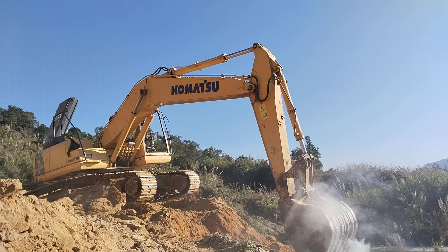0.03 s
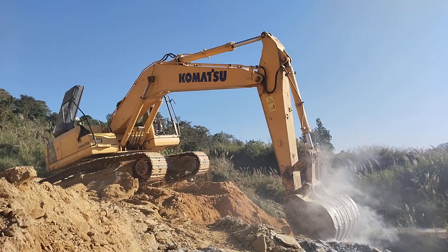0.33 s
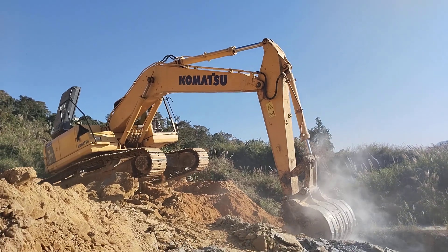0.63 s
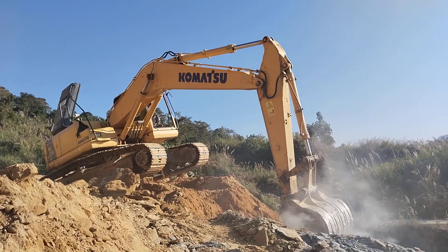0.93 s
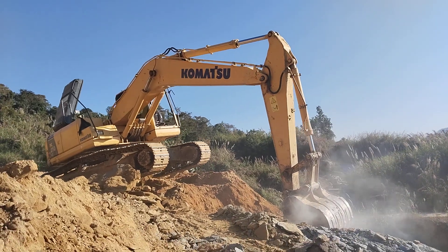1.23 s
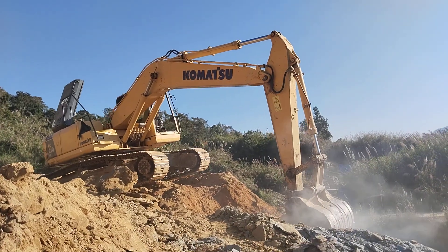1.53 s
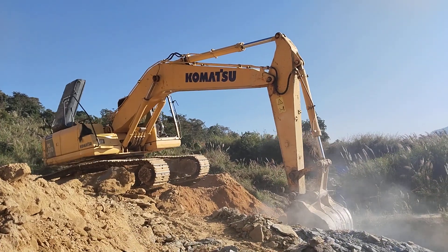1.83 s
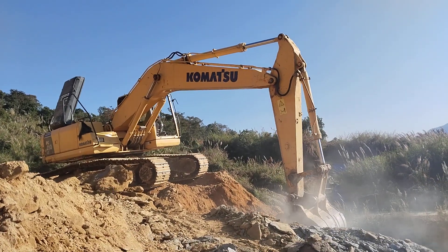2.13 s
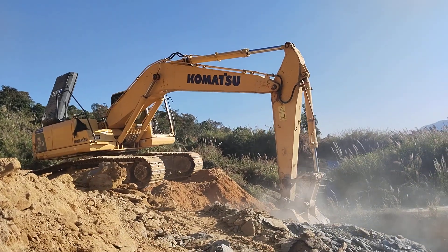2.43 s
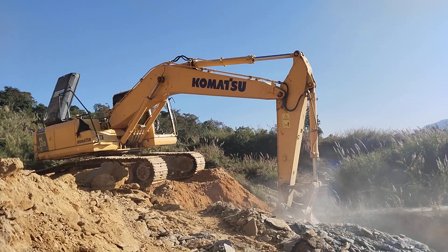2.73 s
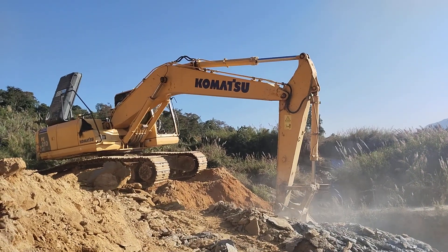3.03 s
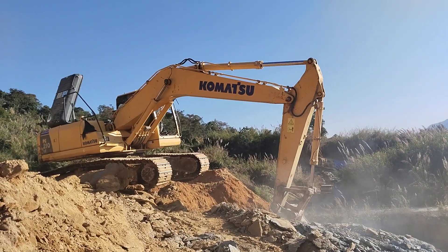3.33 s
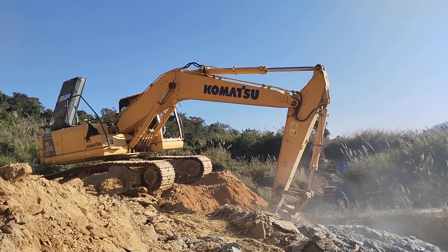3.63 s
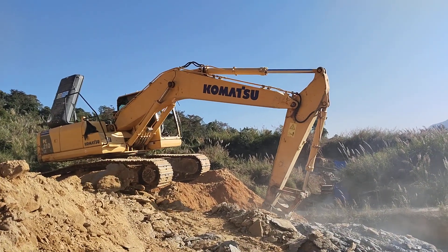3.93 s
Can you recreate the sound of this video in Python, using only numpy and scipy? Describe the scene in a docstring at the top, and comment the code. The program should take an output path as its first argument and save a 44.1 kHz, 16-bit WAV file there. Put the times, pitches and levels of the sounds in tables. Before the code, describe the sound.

An excavator digs rock, engine rumbling steadily under scrapes, clanks and sliding rubble.

```python
"""A diesel excavator digs in an open quarry. Its six-cylinder engine drones and picks up under load:
exhaust orders, a roar that puffs with each firing, block clatter, a faint turbo whistle.
The steel bucket stick-slips over rock and knocks against it, cracking stone and ringing its modes.
Rubble slides, stones thud, and a low hum swells under load near the end.
On the left a high hiss throbs, like insects in dry grass."""
import sys
import numpy as np
from scipy import signal
from scipy.fft import rfft, irfft
from scipy.io import wavfile
from scipy.ndimage import uniform_filter1d, minimum_filter1d

SR = 44100
rng = np.random.default_rng(int(sys.argv[2]) if len(sys.argv) > 2 else 0)


def unload_audio(sound):
    """Save the sound as a 16-bit wav file, at the path given as the first command line argument."""
    columns = np.transpose(np.atleast_2d(sound))
    # keep every value between -1 and 1, then stretch to whole-number steps
    steps = np.round(np.clip(columns, -1, 1) * 32767)
    wavfile.write(sys.argv[1], SR, steps.astype(np.int16))


N = 176400
T = np.arange(N) / SR
START_S = 0.18


def amp(db):
    """dB to gain."""
    return 10 ** (np.asarray(db) / 20)


def unit(x):
    """Scale to rms 1."""
    return x / np.sqrt(np.mean(x ** 2) + 1e-20)


def curve(points):
    """Interpolate (time, value) over T."""
    return np.interp(T, *np.transpose(points))


def at_hz(points, hz):
    """Interpolate (frequency, value) on a log axis."""
    f, value = np.transpose(points)
    return np.interp(np.log(hz + 1), np.log(f + 1), value)


def colour(x, spectrum):
    """Filter by a dB spectrum; rms 1."""
    size = x.shape[-1]
    return unit(irfft(rfft(x) * amp(at_hz(spectrum, np.fft.rfftfreq(size, 1 / SR))), size))


def wander(hz):
    """Random drift up to about hz; rms 1."""
    return unit(irfft(rfft(rng.standard_normal(N)) * np.exp(-(np.fft.rfftfreq(N, 1 / SR) / hz) ** 2), N))


def pan(left_db):
    """Channel gains for a left-minus-right level."""
    return unit(amp([[left_db / 2], [-left_db / 2]]))


def pan_bands(x, split_hz, low_db, high_db):
    """Pan lows and highs separately; positive is left."""
    low = signal.sosfiltfilt(signal.butter(2, split_hz, fs=SR, output="sos"), x)
    return low * pan(low_db) + (x - low) * pan(high_db)


def spread(pair):
    """Two independent signals to one distant, partly coherent stereo sound."""
    # (frequency [Hz], left-right coherence [0-1])
    coherence = [(60, .999), (200, 0.87), (500, 0.64), (1200, 1), (2400, 1), (4500, 0.43), (14000, 0.66)]
    # (frequency [Hz], left phase lead [rad])
    lead = [(60, -1), (400, 0.82), (1030, -2), (2150, -1.5), (3270, -0.86), (7060, 2), (15000, 6)]
    left, other = rfft(pair)
    hz = np.fft.rfftfreq(N, 1 / SR)
    same = np.clip(at_hz(coherence, hz), 0, 1)
    right = (same * left + np.sqrt(1 - same ** 2) * other) * np.exp(-1j * at_hz(lead, hz))
    return irfft(np.array([left, right]), N)


def noise(spectrum):
    """Distant coloured noise."""
    return colour(spread(rng.standard_normal((2, N))), spectrum)


def grains(per_s, size_db):
    """Random stereo clicks of uneven size."""
    size = amp(size_db * np.minimum(rng.exponential(1, N), 4)) * (rng.random(N) < per_s / SR)
    return unit(spread(size * rng.standard_normal((2, N))))


def add(mix, start_s, sound):
    """Mix in at start_s."""
    part = mix[:, max(round(start_s * SR), 0):][:, :sound.shape[1]]
    part += sound[:, :part.shape[1]]


def exhaust_note(cycle, cylinders, firing_waver=0.076, other_waver=0.29):
    """Wavering engine orders; a hum between orders beats against the firing."""
    # (multiple of engine cycle, level [dB])
    orders = [(4, -18), (4.67, -14), (6, 0), (7, -21), (8, -17), (10, -17), (12, -19), (17, -25), (18, -27),
              (20, -25)]
    # (time [s], level [dB])
    note_level = [(0.25, -33), (0.5, -17), (1.0, -17.5), (1.3, -16.5), (2.0, -15.5), (2.4, -15),
                  (2.8, -14.5), (4, -15.5)]
    note = 0
    for order, db in orders:
        depth = firing_waver if order == cylinders else other_waver
        waver = 1 + depth * (wander(7.9) + 1j * wander(3.1))
        note += amp(db) * (waver * np.exp(2j * np.pi * (order * cycle + rng.random()))).real
    return unit(note) * amp(curve(note_level))


def turbo(flicker_db=5.3, jitter_hz=60):
    """Thin, unsteady turbocharger whistle."""
    # (time [s], pitch [Hz], level [dB])
    whistle = [(0.6, 10350, -73), (2.8, 10700, -62), (3.7, 11030, -53), (4, 11020, -60)]
    s, hz, db = np.transpose(whistle)
    level = amp(np.interp(T, s, db) + flicker_db * wander(17))
    pitch_hz = np.interp(T, s, hz) + jitter_hz * wander(126)
    return level * np.sin(2 * np.pi * np.cumsum(pitch_hz) / SR)


def engine(cylinders=6, puff=0.44, rattle=0.044, flutter_db=1.0, clatter_db=-33.5):
    """Diesel: exhaust note and turbo, plus roar and block clatter pulsed by each firing."""
    # (time [s], firing rate [Hz])
    firing_rate = [(0.78, 88), (1.0, 93), (1.28, 88), (2.22, 88.4), (2.43, 92.7), (2.65, 88), (4, 88.1)]
    # (frequency [Hz], density [dB])
    roar_spectrum = [(22, -48), (40, -28), (62, -1.5), (85, -4.5), (120, 2.5), (175, 0.5), (220, -9.5),
                     (290, -13.5), (360, -22), (480, -26), (900, -43)]
    clatter_spectrum = [(300, -5.5), (460, -15), (525, 3), (640, -11), (790, 0.5), (880, -15.5),
                        (1150, -5.5), (1380, -19.5), (1800, -4), (2250, 2.5), (2900, -6.5), (3450, -8.5),
                        (4400, -21.5), (7500, -20.5), (13000, -73)]
    # (time [s], level [dB])
    roar_level = [(0.18, -31), (0.45, -22), (1.0, -23), (1.45, -28), (2.1, -26), (2.3, -22), (2.55, -25.5),
                  (2.8, -23.5), (3.1, -27.5), (3.4, -24.5), (4, -26)]
    cycle = np.cumsum(curve(firing_rate)) / SR / cylinders
    firing = np.cos(2 * np.pi * cylinders * cycle)
    note = exhaust_note(cycle, cylinders)
    roar = unit(noise(roar_spectrum) * (1 + puff * firing)) * amp(curve(roar_level))
    clatter = unit(noise(clatter_spectrum) * (1 + rattle * firing) * amp(flutter_db * wander(38)))
    clatter = pan_bands(clatter * amp(clatter_db), split_hz=2700, low_db=6.5, high_db=9.5)
    return (note + roar) * pan(1.0) + clatter + turbo()


def bucket_ring(focus_hz, detune, focus_oct=0.15, off_focus_db=-10.5, vary_db=1.5):
    """One contact rings the steel, most near focus_hz; its place and pressure vary the modes."""
    # (frequency [Hz], level [dB], t60 [s])
    modes = [(625, -3, 0.075), (1154, -1, 0.079), (1538, 2, 0.042), (1653, -3, 0.093), (2067, 1, 0.035),
             (2310, 3.5, 0.06), (2540, -5, 0.11), (2746, 4.5, 0.059), (2877, 7, 0.042), (3147, 1.5, 0.047),
             (3530, -17, 0.025)]
    t, ring = T[:SR // 5], 0
    for hz, db, t60 in modes:
        louder, sharper = 2 * rng.random(2) - 1
        phase = rng.random() + 0.24 * rng.random((2, 1))
        off_focus = 1 - np.exp(-(np.log2(hz / focus_hz) / focus_oct) ** 2)
        envelope = amp(db + off_focus_db * off_focus + vary_db * louder - 60 * t / t60)
        ring += envelope * np.sin(2 * np.pi * (hz * (1 + detune * sharper) * t + phase))
    return ring


def scrape(ring_db=-4, crunch_db=-1, judder_db=1.5, bite_db=-20, contacts_per_s=45, contacts=11):
    """Teeth stick and slip: each slip cracks rock, and rings the bucket more on a hard bite."""
    # (time [s], scraping force [dB])
    force = [(0.18, -37), (0.31, -26.5), (0.365, -21.5), (0.47, -19.5), (0.51, -12), (0.555, -19),
             (0.585, -29), (0.63, -27), (0.692, -16), (0.73, -29.5), (0.9, -27), (0.99, -21), (1.1, -35.5),
             (1.4, -41), (2.3, -32.5), (2.62, -35.5), (2.73, -27.5), (2.85, -38)]
    # rock cracking under steel (frequency [Hz], density [dB])
    crunch_spectrum = [(100, -32), (300, 3.5), (650, -6), (1100, 6.5), (1380, -6.5), (1600, 3),
                       (1950, -12.5), (2950, 3), (3600, -4), (5000, -13), (8000, -14.5), (15000, -38)]
    slips = unit(grains(per_s=5000, size_db=0.5) * amp(judder_db * wander(64)))
    contact = (T * contacts_per_s).astype(int) % contacts
    ring = 0
    for k, hz in enumerate(rng.permutation(np.geomspace(1100, 3400, contacts))):
        drive = (slips + slips[0]) * (contact == k)
        ring += signal.oaconvolve(drive, unit(bucket_ring(hz, detune=0.048)), axes=1)[:, :N]
    force_db = curve(force)
    ring = unit(ring) * amp(ring_db + np.minimum(force_db - bite_db, 0) / 2)
    crunch = amp(crunch_db) * colour(slips, crunch_spectrum)
    return pan_bands(ring + crunch, split_hz=850, low_db=-6, high_db=1.5) * amp(force_db)


def rubble():
    """Loose stones tumble in short slides."""
    # (peak time [s], level [dB], rise [s], fall [s])
    slides = [(0.22, -26.5, 0.035, 0.34), (0.405, -14, 0.053, 0.088), (0.76, -27.5, 0.084, 0.14),
              (1.013, -19.5, 0.044, 0.09), (2.29, -26, 0.027, 0.083), (2.43, -31.5, 0.034, 0.15),
              (2.71, -28, 0.045, 0.13)]
    # (frequency [Hz], density [dB])
    spectrum = [(100, 5), (260, 2.5), (400, 1), (480, -13), (600, 1), (780, 0), (950, -6), (1160, 0.5),
                (1350, -14), (1600, -7.5), (10000, -54)]
    level = 0
    for s, db, rise_s, fall_s in slides:
        level += amp(db) * np.where(T < s, np.exp(-((T - s) / rise_s) ** 2), np.exp(-abs(T - s) / fall_s))
    return colour(grains(per_s=2000, size_db=1.5), spectrum) * level * pan(-0.73)


def knocks(crack_rise_s=0.00069, ring_rise_s=0.00061):
    """Bucket blows: stone cracks, steel rings. They move left as the bucket is drawn in."""
    # (time [s], crack level [dB], crack decay [s], ring level [dB], focus [Hz])
    blows = [(0.3585, -19, .016, -15, 2950), (0.409, -20, .022, -16, 2880),
             (0.4635, -17.5, .018, -22, 2800), (0.506, -16, .022, -19, 3100),
             (0.5125, -23, .006, -16.5, 2330), (0.5385, -16.5, .011, -20, 2730),
             (0.546, -24, .006, -11, 1535), (0.548, -24, .006, -13.5, 2520),
             (0.6435, -16.5, .009, -10.5, 1950), (0.6825, -16.5, .018, -19, 2800),
             (2.4582, -13.5, .0035, -28, 2880), (2.6892, -12.5, .005, -19, 2850),
             (3.2835, -19.5, .002, -24, 3100)]
    # (frequency [Hz], density [dB])
    crack_spectrum = [(200, -45), (700, -13), (1200, 0.5), (1800, 2.5), (2900, 6), (3800, -0.5),
                      (5500, -11.5), (9000, -19), (15000, -60)]
    # (time [s], left minus right [dB])
    position = [(0.5, 1.5), (2.4, 12)]
    out, t = np.zeros((2, N)), T[:SR // 5]
    for s, crack_db, decay_s, ring_db, focus_hz in blows:
        burst = rng.standard_normal(len(t)) + .5 * rng.standard_normal((2, len(t)))
        crack = colour(burst, crack_spectrum) * np.exp(-t / decay_s) * (1 - np.exp(-t / crack_rise_s))
        ring = bucket_ring(focus_hz, detune=0.002) * (1 - np.exp(-t / ring_rise_s))
        left_db = np.interp(s, *np.transpose(position))
        add(out, s, pan(left_db) * (amp(crack_db) * crack + amp(ring_db) * ring))
    return out


def thuds_and_hum(sag=0.04):
    """Short low thuds, and a longer low hum swelling under load near 3.4 s; each sinks in pitch."""
    # (time [s], pitch [Hz], level [dB], half-width [s])
    low_pulses = [(0.405, 40, -25, .03), (0.495, 157, -16.5, 0.048), (2.3, 172, -10, 0.025),
                  (2.385, 123.4, -6, 0.034), (2.557, 135, -13, 0.013), (2.738, 160, -10, 0.0065),
                  (3.38, 116.7, -15, 0.16)]
    out = 0
    for s, hz, db, width_s in low_pulses:
        t = T - s
        phase = 2 * np.pi * hz * t * (1 - sag * t / width_s / 2)
        out += amp(db) * np.exp(-(t / width_s) ** 2) * np.sin(phase)
    return out


def insects(chirps_per_s=14.6, chirp_s=0.022, chorus_db=-40, rasp_db=1.5, fade_s=0.88):
    """Runs of rasping chirps over a steady chorus, fading in."""
    # (first chirp [s], last chirp [s], level [dB])
    runs = [(0.627, 0.823, -28), (0.918, 1.052, -35.5), (1.142, 1.47, -35), (1.552, 1.819, -30.5),
            (1.927, 2.099, -32.5), (2.17, 2.823, -32), (2.91, 3.308, -32.5), (3.407, 3.502, -36.5),
            (3.57, 3.945, -38.5)]
    # (frequency [Hz], density [dB])
    spectrum = [(3000, -53), (4600, -2.5), (5500, -1), (7400, 5.5), (9300, 4.5), (11500, -4), (13300, 3),
                (15500, -6.5)]
    power = np.full(N, amp(chorus_db) ** 2)
    for first_s, last_s, db in runs:
        for s in np.linspace(first_s, last_s, round((last_s - first_s) * chirps_per_s) + 1):
            power += amp(db) ** 2 * np.exp(-((T - s) / chirp_s) ** 2)
    hiss = unit(noise(spectrum) * amp(rasp_db * wander(370)))
    fade_in = np.clip((T - START_S) / fade_s, .3, 1)
    return pan_bands(hiss, split_hz=6800, low_db=-5.0, high_db=12.0) * np.sqrt(power) * fade_in


def quarry_scatter(x, t60_s=0.1, delay_s=0.008, echoes_per_s=2000):
    """Thin reflections off the spoil banks, much alike left and right."""
    t = T[:SR // 2]
    echoes = rng.standard_normal((2, len(t))) * (rng.random((2, len(t))) < echoes_per_s / SR)
    tail = echoes * (t > delay_s) * amp(-60 * t / t60_s)
    tail = tail + .5 * tail[::-1]
    return signal.fftconvolve(x, tail / np.linalg.norm(tail[0]), axes=1)[:, :N]


def scene():
    """Engine, digging and insects in open air."""
    digging = scrape() + knocks() + rubble()
    return engine() + digging + amp(-7.5) * quarry_scatter(digging) + thuds_and_hum() + insects()


def record(dry, ceiling=0.95, recover_s=0.01, cutoff_hz=15500):
    """Silence until START_S, peak limiter, low-pass."""
    gated = dry * np.clip((T - START_S) * SR / 64, 0, 1)
    size = round(recover_s * SR)
    gain = ceiling / np.maximum(abs(gated).max(0), ceiling)
    gain = uniform_filter1d(minimum_filter1d(gain, size), size)
    lowpass = signal.firwin(511, cutoff_hz, window=("kaiser", 9), fs=SR)
    return signal.oaconvolve(gated * gain, lowpass[None], "same")


dry = scene()
out = record(dry)
unload_audio(out)
```